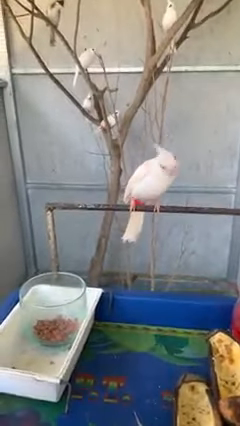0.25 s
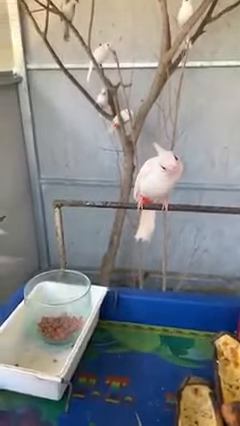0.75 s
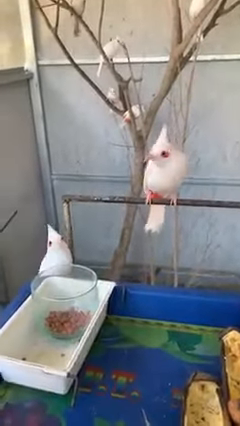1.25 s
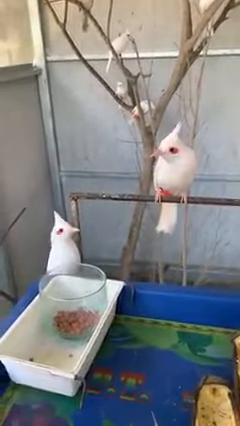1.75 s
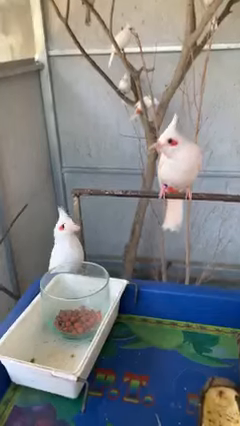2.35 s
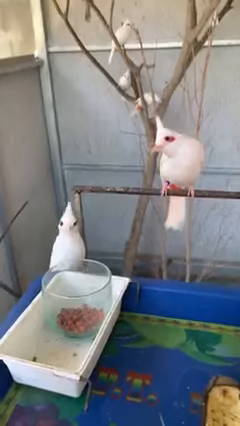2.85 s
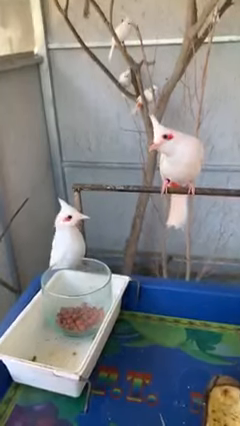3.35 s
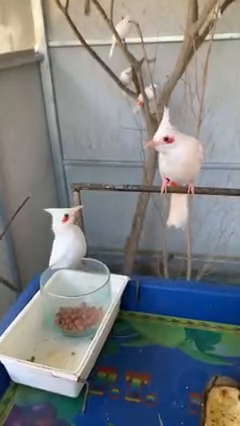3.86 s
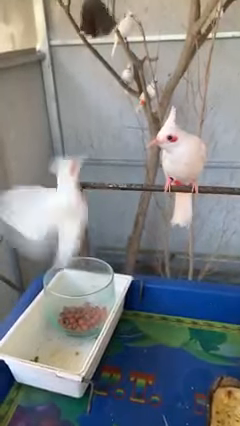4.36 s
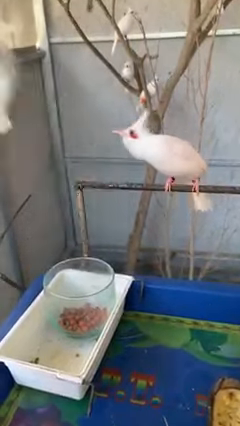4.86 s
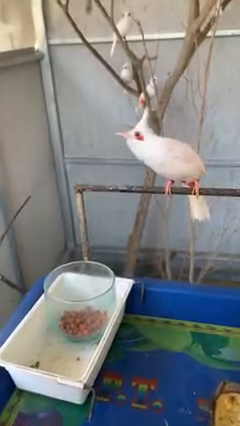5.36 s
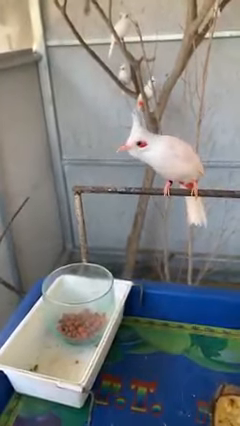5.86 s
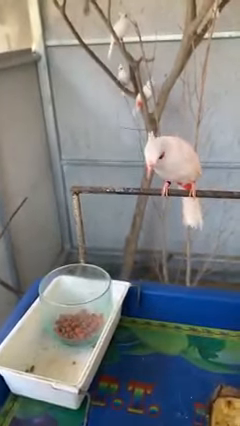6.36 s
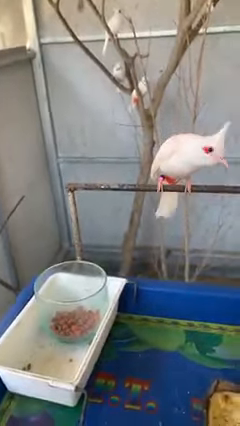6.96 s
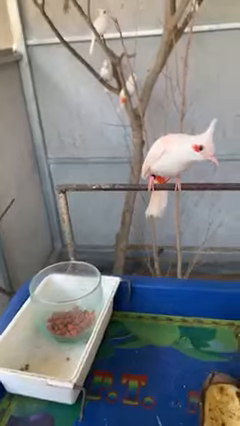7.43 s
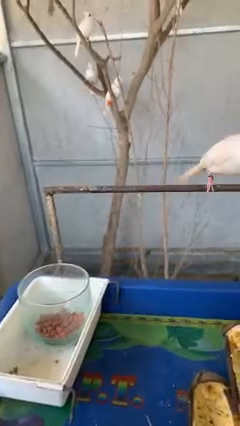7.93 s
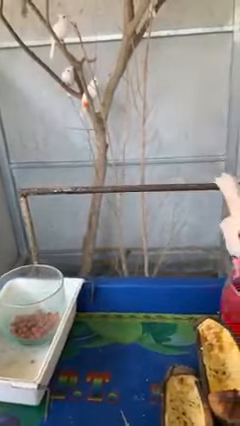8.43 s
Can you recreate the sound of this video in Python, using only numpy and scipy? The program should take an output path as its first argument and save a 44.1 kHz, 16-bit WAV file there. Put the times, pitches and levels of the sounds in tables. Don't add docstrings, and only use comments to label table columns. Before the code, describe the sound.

A bare, hard-walled aviary heard close through a phone in stereo, with faint far bird chatter, low outdoor rumble and thin hiss. Soft flicked chirps come around 0.6 s, then a claw tap and a piercing, harsh alarm chirp at 1.1 s. From 1.5 to 2.6 s quiet whistles, rasps and thin high peeps overlap, with a faint low rattle. A loud burry falling swoop lands at 2.8 s, followed by denser whistles through 4.7 s as traffic swells near 4 s. A second sharp alarm chirp bursts at 4.8 s; rapid strained rising cries crowd 5.5-5.7 s. Clear whistles and burrs continue, one bright at 7.0 s, then harsh calls and a clear chirp around 7.4-7.6 s. A short chirp sounds at 8.1 s, crisp claw ticks on the metal perch at 8.4 s, and low rising notes close. Notes leave brief ringing tails; feathers rustle very faintly.

```python
import sys
import numpy as np
from scipy import signal
from scipy.fft import rfft, irfft, next_fast_len
from scipy.io import wavfile
from scipy.ndimage import uniform_filter1d

SR = 44100
rng = np.random.default_rng(int(sys.argv[2]) if len(sys.argv) > 2 else 0)


def master_out(mix):
    frames = np.transpose(np.atleast_2d(mix))
    ceiling = np.clip(frames, -1, 1)
    pcm = np.round(ceiling * 32767).astype(np.int16)
    wavfile.write(sys.argv[1], SR, pcm)


def gain_from_db(level_db):
    decades = np.asarray(level_db, float) / 20
    return 10 ** decades


N = 383229
T = np.arange(N) / SR

# start in seconds, length in seconds,
# middle pitch in Hz, level in dB, glide as share of pitch.
ALARM_CHIRPS = [(1.083, .025, 2040, -41, 0.074), (1.08, .021, 3170, -37, .05),
                (1.09, 0.022, 3380, -14, 0.01), (1.099, 0.043, 3810, -17.5, 0.032),
                (1.105, 0.028, 3200, -19, -0.0047), (1.13, 0.049, 4830, -39, 0.085),
                (4.797, .035, 2170, -38.5, .08), (4.796, 0.024, 3120, -34, 0.14),
                (4.811, 0.037, 3706, -16.5, 0.026), (4.821, 0.019, 3323, -14, 0.00065),
                (4.815, 0.02, 3010, -24, 0.12), (4.835, .04, 4610, -30, .15),
                (7.498, 0.044, 2837, -21, -0.041)]
# start in seconds, length in seconds, middle pitch in Hz,
# level in dB, glide as share of pitch.
RIGHT_BIRD = [
    (8.063, 0.027, 2180, -36, -.02),
    (8.086, 0.024, 2216, -26, 0.052),
    (8.11, .045, 2237, -36.5, -.01),
]
# start in seconds, length in seconds, middle pitch in Hz,
# level in dB, glide as share of pitch.
CRIES = [
    (5.565, .03, 3950, -31, .05),
    (5.6, .07, 3550, -25, .02),
    (5.665, .02, 3750, -25, .1),
    (5.67, .03, 4350, -32, .05),
    (5.54, 0.057, 3456, -23, .05),
    (5.53, 0.038, 2975, -29, 0.068),
    (5.585, 0.054, 3960, -22.5, .16),
    (5.618, 0.033, 3160, -16.5, -0.081),
    (5.645, 0.037, 3380, -18.5, 0.2),
    (5.68, 0.033, 4110, -28.5, 0.12),
]
# start in seconds, length in seconds,
# middle pitch in Hz, level in dB, glide as share of pitch.
FLICKS = [(.57, 0.03, 3473, -39, 0.12), (.655, 0.082, 2540, -48, -0.072), (.678, 0.042, 2903, -33, 0.0033),
          (.715, 0.015, 3350, -36, 0.27), (2.492, 0.023, 2936, -40.5, -0.19),
          (2.875, 0.046, 2295, -37, -0.21), (2.93, 0.046, 2553, -37.5, 0.29),
          (3.295, 0.052, 3440, -54.5, -0.062), (3.375, 0.04, 1890, -40.5, -.2),
          (4.465, 0.04, 3085, -32.5, 0.25), (4.63, 0.077, 2275, -41, 0.23), (6.56, 0.093, 1830, -43, -0.44),
          (6.925, 0.034, 3360, -48, 0.12), (7.565, 0.027, 1750, -44, 0.19), (7.71, .06, 3830, -53.5, 0.047),
          (8.005, 0.033, 2830, -49.5, -0.013), (8.015, 0.023, 2520, -53, 0.084),
          (7.335, 0.039, 1604, -48.5, 0), (7.93, 0.011, 2515, -50, 0.0051),
          (8.07, 0.055, 4250, -57.5, -0.058), (5.04, 0.061, 1906, -48, -0.1)]
# start in seconds, length in seconds, middle pitch in Hz,
# level in dB, glide as share of pitch.
SWOOPS = [
    (1.16, 0.07, 2615, -38, -0.03),
    (6.102, 0.086, 2078, -35, -0.094),
    (2.796, 0.064, 3022, -29, -0.27),
    (6.723, .096, 2814, -40, -0.34),
    (6.812, 0.085, 3120, -38.5, -0.18),
    (7.43, 0.089, 3203, -32.5, -0.11),
    (7.588, .058, 2944, -32, -0.086),
    (8.514, 0.044, 1380, -45.5, 0.313),
    (8.559, 0.071, 1738, -38.5, 0.33),
]
# start in seconds, length in seconds,
# pitch in Hz, level in dB.
LOW_WHISTLES = [(2.179, 0.048, 1454, -45.5), (2.272, 0.024, 1632, -39), (2.318, 0.025, 1623, -33),
                (2.361, 0.033, 1610, -41.5), (2.399, 0.062, 1576, -41.5), (2.765, 0.027, 2087, -38),
                (3.988, 0.019, 1523, -46), (3.278, 0.073, 2160, -42.5), (3.538, 0.03, 1652, -44),
                (3.818, 0.067, 1720, -38), (4.294, 0.054, 1760, -38), (4.474, 0.021, 1590, -36),
                (4.524, 0.034, 1604, -40.5), (4.582, 0.024, 1594, -40), (5.736, 0.098, 1830, -41.5),
                (6.13, 0.11, 1796, -42.5), (6.752, 0.027, 1565, -35), (6.865, 0.02, 1643, -40),
                (7.625, 0.025, 2046, -45), (8.09, 0.046, 2199, -39.5), (8.66, 0.036, 2160, -39)]
# start in seconds, length in seconds, pitch in Hz, level in dB.
MIDDLE_WHISTLES = [(1.59, 0.075, 2318, -44.5), (2.224, 0.12, 2530, -53), (2.52, 0.07, 2555, -43),
                   (3.01, 0.034, 2720, -59), (3.7, 0.06, 2140, -38.5), (4.13, 0.11, 2435, -44),
                   (4.155, 0.057, 2054, -40), (3.141, 0.053, 2543, -33.5), (3.466, 0.033, 2600, -35.5),
                   (3.559, 0.03, 2253, -40.5), (3.678, 0.044, 2446, -40.5), (3.903, 0.06, 2583, -37.5),
                   (3.998, 0.03, 2180, -41), (4.391, 0.064, 2330, -46), (5.055, 0.03, 2454, -34),
                   (5.244, 0.055, 2290, -39.5), (5.295, 0.02, 2356, -44), (5.429, 0.079, 2550, -39),
                   (6.014, 0.011, 2370, -28.5), (6.044, 0.064, 2364, -28.5), (6.241, 0.066, 2273, -40.5),
                   (7.112, 0.079, 2228, -39.5)]
# start in seconds, length in seconds, pitch in Hz, level in dB.
HIGH_WHISTLES = [(1.555, 0.026, 3330, -45), (1.645, 0.016, 3340, -45), (1.757, 0.033, 3330, -41.5),
                 (1.85, .035, 3356, -47), (1.394, 0.044, 3670, -45), (2.648, 0.018, 2950, -33),
                 (2.655, 0.025, 3530, -46), (2.006, 0.015, 3400, -42), (2.935, 0.024, 3370, -36.5),
                 (3.431, 0.037, 2870, -30.5), (3.712, 0.056, 3450, -41.5), (3.96, 0.047, 3600, -50),
                 (5.057, 0.042, 3375, -34), (5.795, 0.022, 2910, -25), (5.77, .03, 2950, -36),
                 (6.167, 0.055, 2860, -43.5), (6.443, 0.053, 3290, -40), (6.7, 0.04, 3525, -42.5),
                 (7, 0.027, 2857, -25), (7.048, 0.089, 2860, -44.5), (8.597, 0.053, 2753, -38)]
# start in seconds, length in seconds, middle pitch in Hz, level in dB.
FALLING_WHISTLES = [
    (.752, 0.03, 3095, -39.5),
    (.83, 0.019, 3120, -57),
    (1.271, 0.065, 2453, -44.5),
    (2.093, 0.2, 2830, -49),
    (2.22, 0.054, 1724, -36.5),
    (3.28, 0.1, 2956, -39.5),
    (5.848, .067, 2803, -34),
    (6.361, 0.053, 2860, -34.5),
    (7.465, 0.03, 3130, -33),
]
# start in seconds, length in seconds, middle pitch in Hz, level in dB.
RISING_WHISTLES = [
    (2.62, 0.043, 1720, -46.5),
    (3.24, 0.073, 2930, -37),
    (3.869, 0.04, 2940, -32),
    (4.388, 0.026, 1583, -35),
    (4.43, 0.024, 1643, -38),
    (4.69, 0.085, 3735, -49),
    (6.655, 0.033, 1600, -35),
    (6.705, 0.023, 1692, -37),
    (6.895, 0.029, 2165, -43),
    (7.552, 0.022, 2800, -27.5),
]
# start in seconds, length in seconds, pitch in Hz, level in dB.
BURRS = [(5.01, .04, 2450, -39), (5.32, .05, 2450, -44), (3.6, .04, 2300, -46), (4.02, .04, 2650, -46),
         (1.204, 0.15, 2504, -47), (1.2, 0.089, 3520, -45.5), (1.44, 0.062, 3520, -46),
         (1.57, 0.025, 2700, -38), (1.665, 0.016, 2740, -37), (1.979, 0.042, 3140, -43),
         (2.318, 0.041, 3420, -42), (.235, 0.14, 3040, -56), (3.122, 0.022, 2895, -35.5),
         (3.37, 0.027, 2946, -38), (3.392, 0.063, 1833, -42.5), (4.148, 0.062, 3260, -41.5),
         (4.688, 0.043, 3020, -34.5), (5.425, 0.0056, 2890, -29.5), (5.463, 0.082, 2104, -41.5),
         (5.851, 0.034, 2467, -29), (6.796, 0.047, 1766, -37)]
# start in seconds, length in seconds, pitch in Hz, level in dB.
RASPS = [(4.835, .05, 4350, -33), (4.85, .04, 3600, -37), (1.135, .04, 4200, -34), (1.14, .06, 3300, -36),
         (5.83, .04, 4700, -51), (.579, 0.022, 3674, -46.5), (.717, 0.055, 3530, -57),
         (1.562, 0.04, 3315, -42.5), (1.595, 0.077, 2800, -48), (1.74, 0.069, 2700, -47),
         (1.841, 0.059, 2700, -52), (1.75, 0.14, 1800, -59.5), (1.62, 0.13, 3700, -52.5),
         (2.8, 0.043, 3700, -41.5), (3.715, 0.029, 2980, -40), (4.266, 0.061, 2455, -45.5),
         (4.455, 0.065, 2287, -40.5), (5.829, 0.028, 3610, -36), (5.999, 0.061, 1805, -38.5),
         (6.03, 0.077, 3110, -36), (6.115, 0.071, 2830, -39.5), (5.612, 0.036, 1860, -39.5),
         (6.365, 0.026, 3170, -38), (7.414, 0.011, 1830, -36.5), (7.415, 0.079, 2994, -32),
         (7.422, 0.03, 3480, -27.5), (7.488, 0.01, 3260, -33), (7.579, 0.039, 3560, -36.5)]
# start in seconds, length in seconds, level in dB.
SCOLDS = [
    (2.181, 0.28, -54.5),
    (4.325, 0.4, -53),
    (6.603, .26, -50),
]
# start in seconds, level in dB.
PEEPS = [
    (1.842, -46),
    (1.969, -46),
    (2.104, -45),
    (2.183, -44.5),
    (2.337, -45),
    (3.92, -52),
    (5.17, -50.5),
    (6.439, -43),
]
# start in seconds, length in seconds, level in dB, sheen in dB.
SHRILL_EDGES = [
    (1.077, 0.04, -36, 3),
    (1.33, 0.098, -62, -12),
    (1.542, 0.666, -62.5, -15.5),
    (2.21, 0.28, -65.5, -11),
    (2.8, 0.034, -67, 2.5),
    (3.417, 0.013, -62, 3.5),
    (4.48, 0.069, -72, 0),
    (4.793, 0.027, -40, 5.5),
    (5.53, 0.16, -47, 4),
    (8.372, 0.03, -65, 8),
]
# start in seconds, peak in dB, ring in Hz, T60 in seconds,
# share of dull knock.
CLAW_TICKS = [(.352, -51, 690, 0.16, .02), (1.047, -25, 400, 0.013, 0.026), (6.155, -38, 550, 0.027, 0.023),
              (7.688, -24, 337, 0.012, 0.019), (8.38, -39.5, 11670, 0.03, 0.54),
              (8.383, -34.5, 11030, 0.094, 0.058), (8.383, -51.5, 7170, 0.041, 0.045),
              (8.394, -48.5, 1510, 0.0085, 0.34), (8.419, -25.5, 1800, 0.01, 0.47),
              (8.418, -20.5, 3900, 0.026, 0.044), (8.419, -46, 8600, .04, 0.043),
              (8.461, -29, 1420, 0.012, 0.35), (8.481, -38, 1680, 0.027, 0.16)]
# start in seconds, length in seconds, level in dB, sheen in dB.
HISS_BURSTS = [(0, 0.083, -68.5, -13), (.192, 0.027, -56.5, -11), (.415, .14, -60, 1),
               (.604, .17, -56, -4), (3.005, 0.21, -68, -0.5), (3.467, 0.48, -70, -11),
               (3.749, 0.15, -64, -2), (3.91, 0.31, -60.5, -2), (4.261, 0.17, -60.5, -3.5),
               (4.721, 0.049, -58.5, -0.5), (5.006, 0.16, -61.5, -2.5), (5.248, 0.084, -54, -2.5),
               (5.81, 0.053, -52.5, -11), (6.022, 0.2, -64, -2), (6.638, .25, -69.5, -4),
               (7.424, 0.15, -58.5, -1.5), (8.045, 0.037, -62.5, -8.5)]
# frequency in Hz, T60 in seconds.
ROOM_DECAY = [(800, 0.15), (2500, 0.24), (5000, 0.27), (11000, 0.21)]
# frequency in Hz, lead of the left port in radians.
PORT_LEAD = [(250, 0), (1600, .2), (3000, .8), (4050, 1.5), (4400, np.pi), (5200, np.pi), (6200, 2 * np.pi),
             (9500, 2 * np.pi), (11700, 7.6), (12300, 3 * np.pi), (12900, 3 * np.pi), (13700, 4 * np.pi)]
# frequency in Hz, likeness from 0 to 1.
STEREO_LIKENESS = [(130, .998), (290, .8), (640, .5), (1400, .7), (3000, .3), (4400, .995), (5200, 1),
                   (5700, .6), (6200, 1), (7200, 1), (7800, .6), (10000, .3), (12000, .9), (13700, 1)]
# time in seconds, hum in dB, far chatter in dB.
YARD_LEVELS = [(0, -72, -73.5), (0.502, -49, -46.5), (1.4, -45, -63), (1.6, -46.5, -48),
               (2.6, -49.5, -45.5), (2.9, -61, -51), (4.2, -51.5, -47), (5.802, -60.5, -50),
               (6.9, -57, -43), (7.301, -53.5, -49), (8.3, -55, -53.5), (8.69, -69, -43)]
# time in seconds, level in dB.
TRAFFIC = [
    (0, -48.5),
    (.7, -51.5),
    (1.5, -55),
    (3, -64),
    (4, -46.5),
    (4.8, -54.5),
    (7, -67.5),
    (7.6, -50.5),
    (8.69, -50.5),
]
# time in seconds, level in dB.
FAR_MOTOR = [
    (7.2, -100),
    (7.3, -59.5),
    (8.3, -64),
    (8.5, -77),
]
# time in seconds, level in dB.
LOW_ENGINE = [
    (2.9, -100),
    (3.15, -65),
    (4.2, -64),
    (4.4, -100),
]
# frequency in Hz, density in dB per Hz.
AIR_SPECTRUM = [(22, -39), (44, 6), (70, 0.5), (102, 0), (700, -18), (957, -22), (1560, -20), (2400, -28),
                (3120, -54.5), (5280, -120)]
# start in seconds, length in seconds.
SIDE_LEAKS = [(1.14, .05), (1.53, .06), (1.95, .07), (3.43, .03), (3.53, .03), (4.79, .02), (4.87, .07),
              (5.5, .03), (5.8, .08), (5.895, .03), (7.53, .015), (8.06, .03), (8.37, .06), (8.45, .035),
              (8.595, .025)]


def close(notes, flutter_hz):
    out = np.zeros(N)
    for s, length, hz, db, glide in notes:
        add(out, *slur(s, max(length - .02, 0), hz, db, glide, flutter_hz, fade_s=.005, swell=.25))
    return out


def birds():
    out = np.zeros(N)
    for s, length, db in SCOLDS:
        add(out, *slur(s, length, 1276, db, 0.023, 427))
    rattle_hz = 42 + 12 * np.sin(31 * T)
    out *= 1 + .7 * np.sin(2 * np.pi * np.cumsum(rattle_hz) / SR)
    voices = [(LOW_WHISTLES, 0.035, 226), (MIDDLE_WHISTLES, 0.013, 206), (HIGH_WHISTLES, 0.0028, 149),
              (FALLING_WHISTLES, -0.066, 276), (RISING_WHISTLES, .085, 280),
              (BURRS, 0.0067, 510), (RASPS, -0.0094, 820)]
    for notes, glide, flutter_hz in voices:
        for row in notes:
            add(out, *slur(*row, glide, flutter_hz))
    for row in SWOOPS:
        add(out, *slur(*row, flutter_hz=540))
    for notes, flutter_hz in (FLICKS, 333), (CRIES, 433):
        for row in notes:
            add(out, *slur(*row, flutter_hz, fade_s=0.023))
    for s, db in PEEPS:
        add(out, *slur(s, .03, 4020, db, 0, 180))
    return out


def slur(s, length, hz, db, glide, flutter_hz, fade_s=0.026, swell=1):
    return s - .005, note(length, hz * (1 - glide / 2), hz * (1 + glide / 2), db, flutter_hz, fade_s, swell)


def note(length, hz0, hz1, db, flutter_hz=210, fade_s=0.043, swell=1):
    t = np.arange(0, length + .02, 1 / SR)
    size, steps = next_fast_len(len(t)), np.arange(-600, 600)
    sidebands = np.zeros(size, complex)
    sidebands[steps % size] = rng.standard_normal((len(steps), 2)) @ [1, 1j]
    off_hz = np.fft.fftfreq(size, 1 / SR)
    core = np.exp(-(off_hz / (flutter_hz * .5)) ** 2)
    skirt = gain_from_db(-20) * np.exp(-(off_hz / 630) ** 2)
    sidebands *= core + skirt
    wobble = evened(np.fft.ifft(sidebands)[:len(t)])
    ragged = np.clip(flutter_hz / 380, 0, .93)
    swing = (1 - ragged) + ragged * wobble
    carrier = np.exp(2j * np.pi * np.cumsum(np.linspace(hz0, hz1, len(t))) / SR)
    tone = evened(swing * carrier)
    tone = tone + gain_from_db(-29) * ragged ** 2 * evened(tone * tone)
    rise_s = swell * (0.013 + 0.035 * length)
    rise = np.sin(np.minimum(t / rise_s, 1) * np.pi / 2) ** 2
    fall = np.clip((t[-1] - t) / fade_s, 0, 1)
    return gain_from_db(db) * np.sqrt(2) * tone.real * rise * fall


def ticks():
    out, t = np.zeros(N), np.arange(6000) / SR
    for s, db, hz, t60, knock in CLAW_TICKS:
        onset = np.minimum(t * hz, 1)
        ring = np.sin(2 * np.pi * hz * t) * gain_from_db(-60 * t / t60) * onset
        crack = uniform_filter1d(rng.standard_normal(len(t)), size=5) * np.exp(-t / 0.0027)
        add(out, s, gain_from_db(db) * (ring + knock * crack))
    return out


def treble_hiss():
    power, t = np.zeros((3, N)), T[:SR]
    for bursts, top_db in (HISS_BURSTS, -8.5), (SHRILL_EDGES, -19):
        for s, length, db, sheen_db in bursts:
            decay_db = 253.0 * np.clip(t - length, 0, 1)
            shape = np.clip(t / 0.026, 0, 1) * gain_from_db(db - decay_db)
            for row, band_db in zip(power, (0, sheen_db, top_db + 0.25 * sheen_db)):
                add(row, s, (gain_from_db(band_db) * shape) ** 2)
    power[-1] += gain_from_db(-91) ** 2
    bands = [band(4200, 7290, 2.0), band(8980, 11900, 3.3), band(12900, 15300, 2.5)]
    return (np.sqrt(power) * bands).sum(0)


def room(x):
    taps = np.zeros((2, SR // 2))
    slots = np.arange(160, SR // 2 - 20, 20)
    at = slots + rng.integers(0, 20, (2, (SR // 2 - 161) // 20))
    np.put_along_axis(taps, at, rng.choice([-1., 1.], at.shape), 1)
    hz, t, z = signal.stft(taps, SR, nperseg=256)
    decay = gain_from_db(-60 * t / read(ROOM_DECAY, hz)[:, None])
    tail = signal.istft(z * decay, SR, nperseg=256)[1]
    return signal.fftconvolve(x[None], tail / np.linalg.norm(tail[0]), axes=1)[:, :N]


def ports(a, b):
    hz = np.fft.rfftfreq(N, 1 / SR)
    apart = np.arccos(np.clip(read(STEREO_LIKENESS, hz), 0, 1)) / 2
    lead = np.exp(.5j * read(PORT_LEAD, hz))
    a = rfft(a) * np.cos(apart)
    b = 1j * rfft(b) * np.sin(apart)
    return irfft([(a + b) * lead, (a - b) / lead], N)


def chatter(count=560):
    out = np.zeros(N)
    for s, pitch, glide, size in rng.random((count, 4)):
        hz = 1420 + 2150 * pitch
        add(out, s * T[-1], note(.04, hz, hz * (.9 + .2 * glide), 4 * size, 500))
    s, _, far_db = np.transpose(YARD_LEVELS)
    bed = gain_from_db(-9) * band(1740, 3680, 3.3)
    return (evened(out) + bed) * gain_from_db(np.interp(T, s, far_db))


def air():
    hz = np.fft.rfftfreq(N, 1 / SR)
    s, hum_db, _ = np.transpose(YARD_LEVELS)
    traffic_db = np.interp(T, *np.transpose(TRAFFIC))
    rumble = band(40, 183.0, 5.6) * gain_from_db(traffic_db - 5.0)
    gust = band(170, 730, 3.3) * gain_from_db(traffic_db - 15)
    out = []
    for _ in range(2):
        wash = irfft(rfft(rng.standard_normal(N)) * gain_from_db(read(AIR_SPECTRUM, hz)), N)
        wash = evened(wash) * gain_from_db(-52.5)
        hum = band(78.64, 98.8, 4.25) * gain_from_db(np.interp(T, s, hum_db) - 0.5)
        motor = band(569 * .95, 569 * 1.05, 2.5) * gain_from_db(np.interp(T, *np.transpose(FAR_MOTOR)))
        engine = band(311.3 * .96, 311.3 * 1.04, 2.7) * gain_from_db(np.interp(T, *np.transpose(LOW_ENGINE)))
        hiss = gain_from_db(-71.5) * band(2500, 10470, 1.9) + gain_from_db(-73) * band(3200, 4400, 4)
        out.append(wash + rumble + gust + hum + motor + engine + hiss)
    return np.array(out)


def band(lo_hz, hi_hz, patchy_db):
    sos = signal.butter(6, [lo_hz, hi_hz], "bandpass", fs=SR, output="sos")
    x = signal.sosfilt(sos, rng.standard_normal(N))
    flicker = evened(uniform_filter1d(rng.standard_normal(N), 900))
    return evened(x * gain_from_db(patchy_db * flicker))


def evened(x):
    return x / np.sqrt(np.mean(abs(x) ** 2) + 1e-20)


def read(points, hz):
    f, value = np.transpose(points)
    return np.interp(np.log(hz + 1), np.log(f + 1), value)


def add(mix, s, sound):
    part = mix[round(s * SR):][:len(sound)]
    part += sound[:len(part)]


def scene():
    near, far, claws = birds(), chatter(), ticks()
    loud = close(ALARM_CHIRPS, 265)
    wet = room(gain_from_db(-6.5) * loud + gain_from_db(-2) * near + gain_from_db(-3.0) * far + gain_from_db(-12.5) * claws)
    hiss = np.array([treble_hiss(), treble_hiss()])
    direct = gain_from_db(0.5) * (near + claws + loud) + gain_from_db(-22.5) * far
    fields = wet * gain_from_db([[-.1], [4]]) + hiss + air() + direct * gain_from_db([[-.1], [-9]])
    return ports(*fields) + gain_from_db([[-11], [1]]) * close(RIGHT_BIRD, 227)


def duck(x):
    power_db = 10 * np.log10(abs(uniform_filter1d((x ** 2).mean(0), size=800)) + 1e-12)
    recovery_db = T * 78
    held_db = np.maximum.accumulate(power_db + recovery_db) - recovery_db
    over_db = np.maximum(held_db + 23.5, 0)
    lagged_db = np.interp(T - 0.056, T, uniform_filter1d(over_db, size=600))
    return x / gain_from_db(0.33 * lagged_db)


def joined(z, hz, t):
    mid, side = (z[0] + z[1]) / 2, (z[0] - z[1]) / 2
    mid_power = uniform_filter1d(abs(mid) ** 2, size=9, axis=0)
    side_power = uniform_filter1d(abs(side) ** 2, size=9, axis=0)
    weak = mid_power < side_power / gain_from_db(2 * 9.5)
    leaking = sum((t > s) & (t < s + length) for s, length in SIDE_LEAKS) > 0
    leaked = leaking * (mid + 1j * gain_from_db(-11) * side)
    mid = np.where(weak & (hz > 3500) & (hz < 5600), leaked, mid)
    return np.array([mid + side, mid - side])


def dropouts(x):
    hz, t, z = signal.stft(x, SR, nperseg=1024)
    hz = hz[:, None]
    patch_db = 10 * np.log10(uniform_filter1d(abs(z) ** 2, size=9, axis=1).mean(0) + 1e-20)
    nearby_db = uniform_filter1d(patch_db.max(0), size=3)
    luck = uniform_filter1d(rng.standard_normal(patch_db.shape), size=7, axis=0)
    luck = evened(uniform_filter1d(luck, size=5))
    starved = (luck > .9) & (patch_db < nearby_db - 18) & (hz < 9000)
    fall_db = 10 * hz / 1000 + 151 * t
    mask_db = np.maximum.accumulate(patch_db + fall_db, axis=0)
    mask_db = np.maximum.accumulate(mask_db, axis=1) - fall_db - 22.5
    mask_db = mask_db + 4.5 * (hz < 4500)
    hole = (abs(hz - 5000) < 130 / 2) & (luck > -.5)
    streaks = evened(uniform_filter1d(rng.standard_normal(patch_db.shape), size=7))
    faint = patch_db < np.maximum(-104.5, nearby_db - 50.0)
    shut = (starved | hole | faint) & (hz > 3600)
    shut = shut | ((patch_db < mask_db) & (hz > 3300))
    streak_db = 3.5 * (1 + (hz > 12500)) * streaks
    z = z * np.where(shut, .03, 1) * gain_from_db((streak_db - 3 * luck - 2) * (hz > 4300))
    return signal.istft(joined(z, hz, t), SR, nperseg=1024)[1][:, :N]


def low_pass(x):
    return signal.sosfilt(signal.butter(12, 16150, fs=SR, output="sos"), x)


def record(dry):
    mix = dropouts(duck(dry))
    return low_pass(mix)


dry = scene()
out = record(dry)
master_out(out)
```